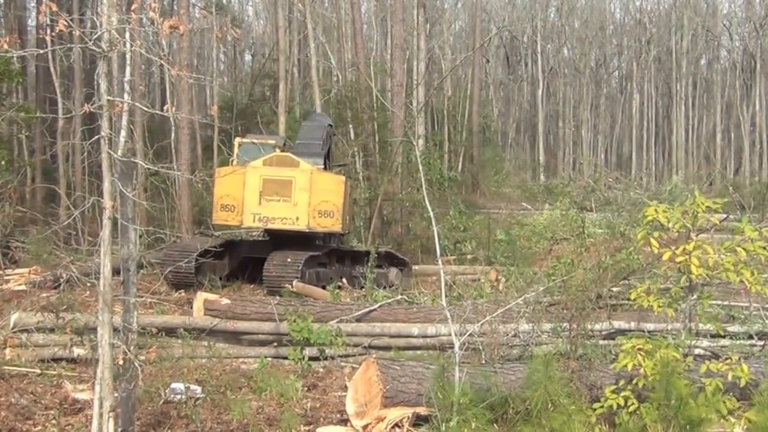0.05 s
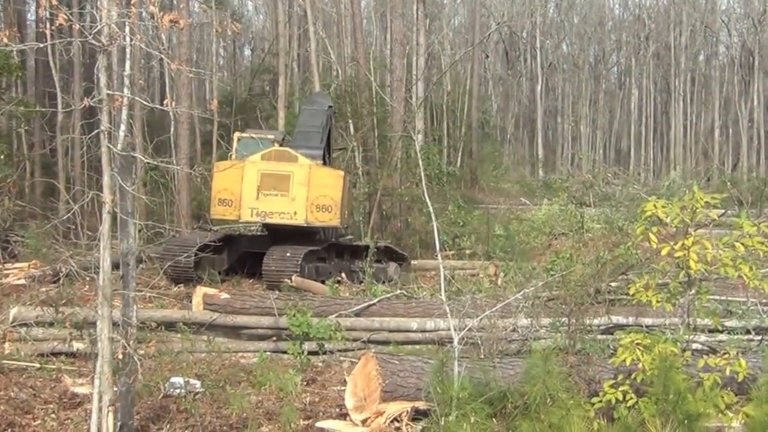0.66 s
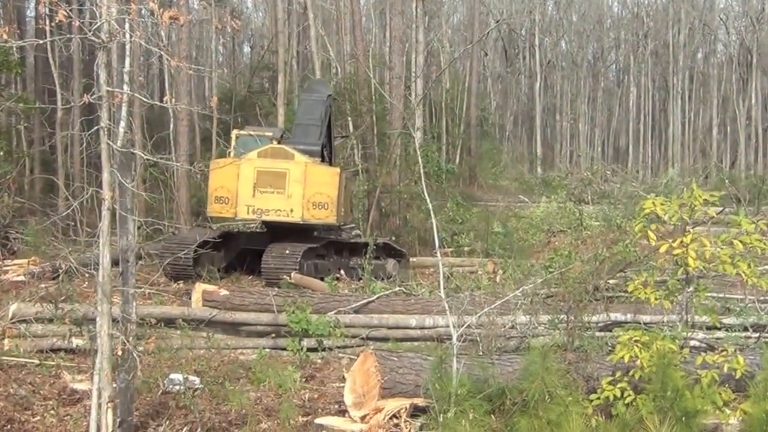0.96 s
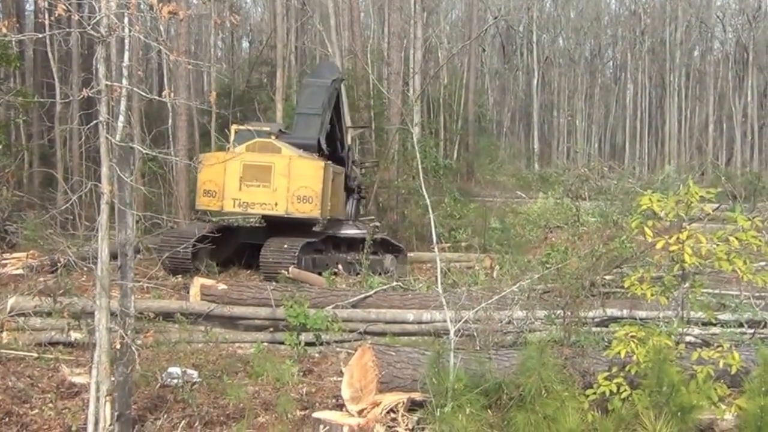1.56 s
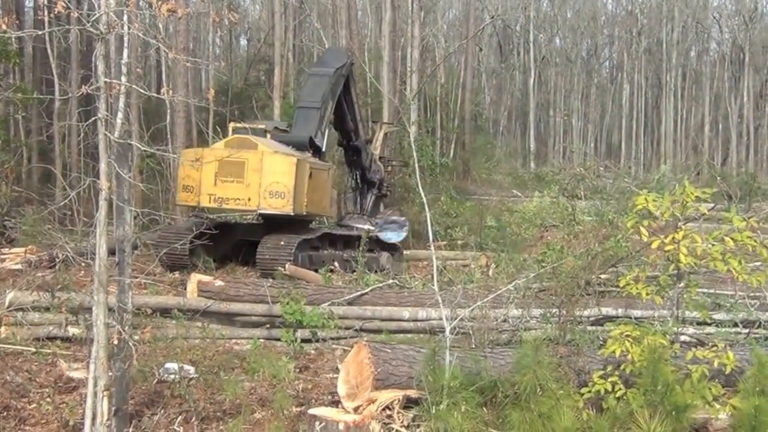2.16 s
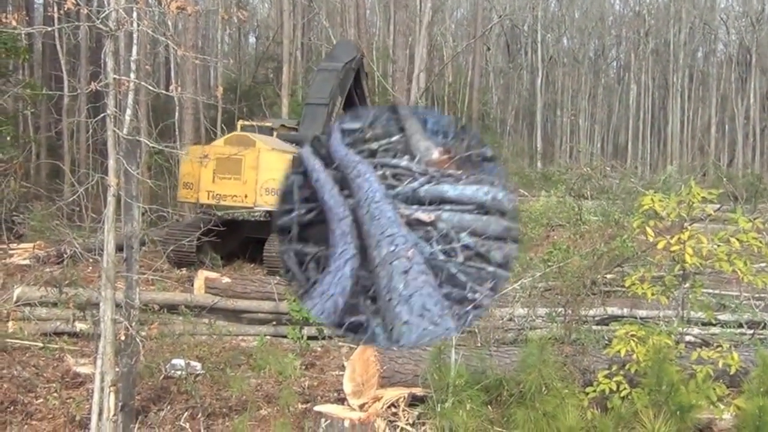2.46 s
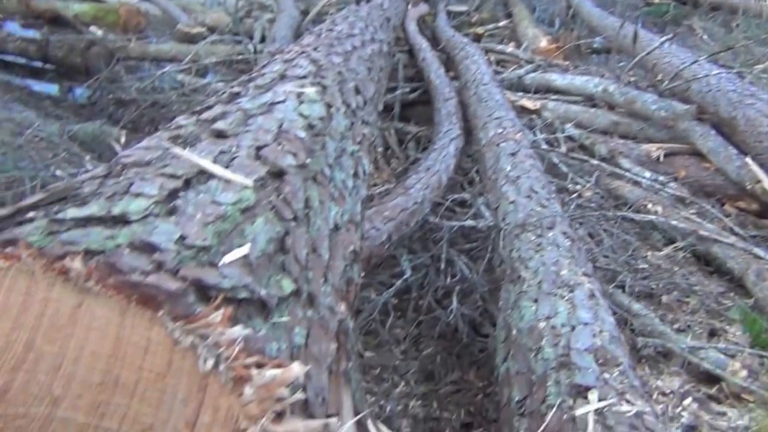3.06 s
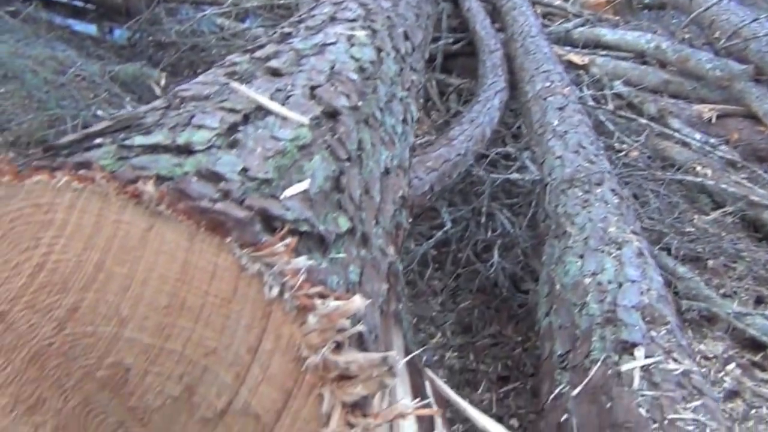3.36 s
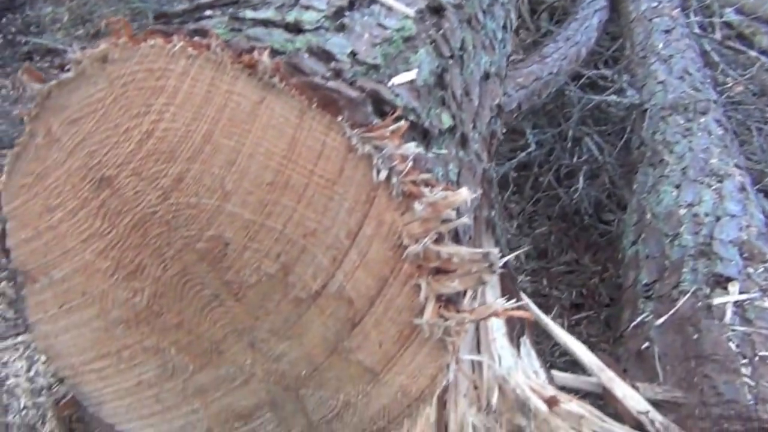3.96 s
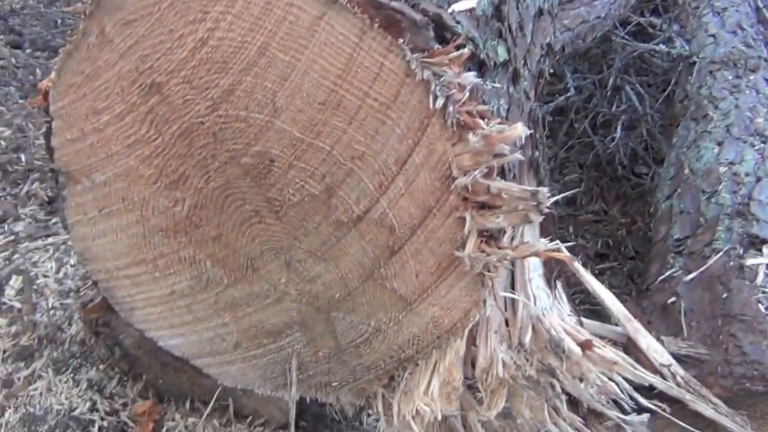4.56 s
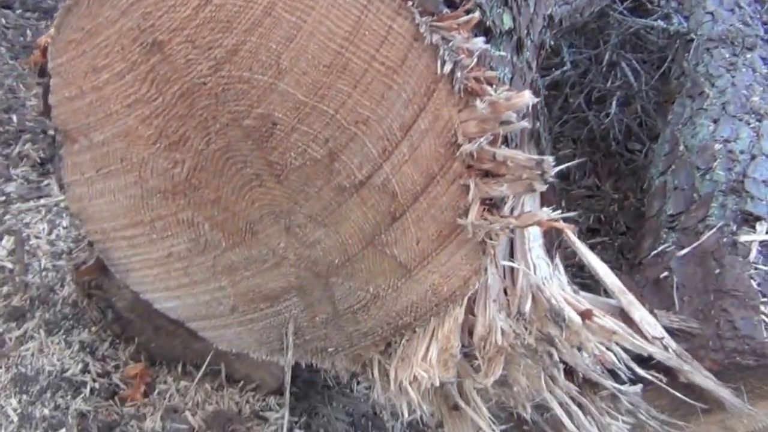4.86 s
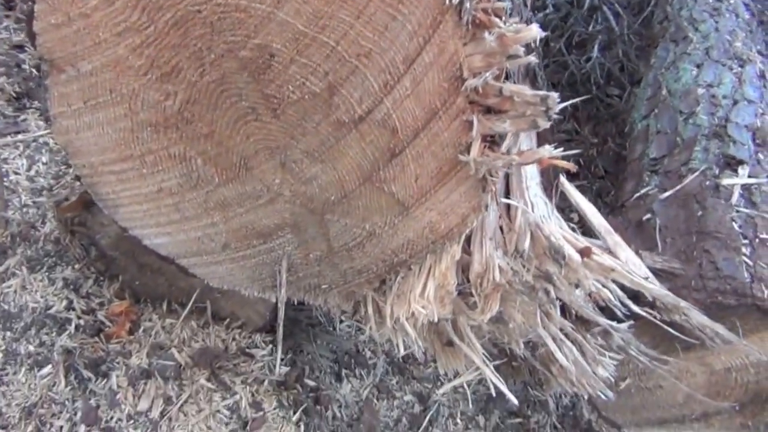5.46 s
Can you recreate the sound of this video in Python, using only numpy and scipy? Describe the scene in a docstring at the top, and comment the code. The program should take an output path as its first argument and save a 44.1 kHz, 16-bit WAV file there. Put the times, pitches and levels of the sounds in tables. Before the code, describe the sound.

A tracked tree feller runs at full throttle across a forest clearing, its diesel engine roaring under hissing hydraulics and a thin, high turbo whine. The engine sags under load and recovers, and a gear rasp grows as the body swings. The machine then fades into quiet woods with a low distant hum. A small bird whistles faintly over a soft rustle, and a twig snaps close to the microphone, followed by tiny cracks.

```python
"""A tracked tree feller runs at full throttle across a clearing: diesel firing harmonics, turbulent fan
roar, oil hissing through valves. Under load the engine sags and recovers while the turbo's blade tone
climbs. The body swings round with a rasp of pump gears, the load eases, and the machine fades into a
quiet wood. There a far engine drones, a thin whistle (perhaps a small bird) sounds over a faint high
rustle, a twig snaps fibre by fibre, and the soft, breathy rustle comes once more."""
import sys
import numpy as np
from scipy import signal
from scipy.fft import rfft, irfft
from scipy.io import wavfile

SR = 44100
rng = np.random.default_rng(int(sys.argv[2]) if len(sys.argv) > 2 else 0)


def pcm_store(signal):
    """Save signal as 16-bit PCM."""
    levels = np.round(np.clip(np.atleast_2d(signal), -1, 1) * 32767)
    wavfile.write(sys.argv[1], SR, levels.astype(np.int16).T)


N = 242991
T = np.arange(N) / SR
HZ = np.fft.rfftfreq(N, 1 / SR)


def amp(db):
    """Amplitude ratio of a level in decibels."""
    return 10 ** (np.asarray(db) / 20)


def unit(x):
    """Normalisation to rms 1."""
    return x / np.sqrt(np.mean(x ** 2) + 1e-20)


def response(points):
    """Magnitude response: levels interpolated over log frequency."""
    f, db = np.transpose(points)
    return amp(np.interp(np.log(HZ + 1), np.log(f + 1), db))


def ramp(start, length):
    """Linear rise from 0 to 1, then held."""
    return np.clip((T - start) / length, 0, 1)


def swell(start, length):
    """Semi-elliptical envelope, zero outside its span."""
    along = ramp(start, length)
    return 2 * np.sqrt(along * (1 - along))


def bump(centre, length):
    """Gaussian envelope."""
    return np.exp(-(2 * (T - centre) / length) ** 2)


def cycles_of(hz):
    """Phase in cycles: the time integral of frequency."""
    return np.cumsum(hz) / SR


def wander(rate_hz):
    """Random modulation: low-pass Gaussian noise of rms 1."""
    hz = HZ[HZ < 6000]
    real, imag = rng.standard_normal((len(hz), 2)).T
    return unit(irfft((real + 1j * imag) * np.exp(-(hz / rate_hz) ** 2), N))


def coloured_noise(spectrum):
    """Spectral shaping of white noise; rms 1."""
    return unit(irfft(rfft(rng.standard_normal(N)) * response(spectrum), N))


def narrowband(hz, width_hz):
    """A resonance driven by turbulence: a carrier of random amplitude and phase; rms 1."""
    angle = 2 * np.pi * cycles_of(np.full(N, hz))
    return unit(wander(width_hz) * np.cos(angle) + wander(width_hz) * np.sin(angle))


def surges(rows):
    """Superposition of noise-driven resonances, each coming and going."""
    return sum(amp(db) * bump(t, length) * narrowband(hz, width) for t, length, db, hz, width in rows)


def scatter(mid, side_spectrum, decay_s):
    """Scattering: echoes off trunks and ground arrive from the sides with random phase."""
    echoes = rfft(rng.standard_normal(N) * np.exp(-T / decay_s))
    side = irfft(rfft(mid) * np.exp(1j * np.angle(echoes)) * response(side_spectrum), N)
    return np.array([mid + side, mid - side])


# Ambient noise spectrum: f/Hz, relative level/dB
AMBIENT_SPECTRUM = [(20, -36), (55, -7.5), (115, -2.5), (145, -10), (215, -7), (280, -4), (420, -1.5),
                    (500, 1.5), (680, 0), (950, 0.5), (1600, -6), (3000, -22), (4000, -27.5), (15500, -30)]

def ambience():
    """Ambient noise of air and far machinery, with one engine's narrowband drone slowly growing."""
    wash = coloured_noise(AMBIENT_SPECTRUM) * amp(-43.5 + .5 * wander(4.9))
    drone = narrowband(81, width_hz=9) * amp(-68.5 + 8 * ramp(4.5, .74))
    return wash + drone


# Spectrum of the faint high rustle: f/Hz, relative level/dB
RUSTLE_SPECTRUM = [(2500, -25), (4500, -2), (6500, -5), (9000, -8), (15000, -22)]
# Soft hisses during and after the whistle: onset t/s, duration/s, level/dB
SOFT_HISSES = [(4.33, .75, -68), (5.28, .45, -66)]

def rustle(impulses_per_s=4000):
    """Shot noise: dense random impulses merge into two soft, breathy, crackling hisses."""
    impulses = rng.standard_normal(N) * (rng.random(N) < impulses_per_s / SR)
    crackle = unit(irfft(rfft(impulses) * response(RUSTLE_SPECTRUM), N))
    return crackle * sum(amp(db) * swell(t, length) for t, length, db in SOFT_HISSES)


# Whistled notes: onset t/s, duration/s, start f/Hz, end f/Hz, mid-glide arch/Hz, level/dB
WHISTLE_NOTES = [(4.18, .05, 4550, 4950, 30, -67.5), (4.222, .19, 4430, 4790, -110, -62.5),
                 (4.35, .07, 9450, 8920, -90, -65), (4.36, .06, 3450, 3020, 0, -70),
                 (4.405, .065, 4790, 4280, 40, -65), (4.495, .03, 8500, 5400, 700, -71),
                 (4.475, .065, 4660, 4930, -110, -66.5), (4.55, .08, 4500, 4270, 40, -65),
                 (4.635, .075, 4470, 4470, 130, -66.5), (4.745, .085, 4400, 4350, 55, -69)]

def whistle(jitter=.003):
    """Frequency modulation: each note is a near sine on an arched glide; a faint high ring lingers."""
    notes = np.zeros(N)
    for t, length, start_hz, end_hz, arch_hz, db in WHISTLE_NOTES:
        envelope = swell(t, length)
        hz = start_hz + (end_hz - start_hz) * ramp(t, length) + arch_hz * envelope ** 2
        cycles = cycles_of(hz * (1 + jitter * wander(120)))
        notes += envelope * amp(db) * unit(np.sin(2 * np.pi * cycles))
    return notes + amp(-71) * swell(4.35, .95) * narrowband(9500, width_hz=450)


# Fibre fractures: t/s, crack level/dB, ring level/dB, crack decay time/s
FRACTURES = [(3.583, -66, -76, 0.0044), (3.832, -72, -54, .004), (4.568, -38, -52, .0012),
             (4.572, -41, -47, 0.0055), (4.58, -55, -56, .004), (4.718, -66, -66, .004),
             (4.815, -63, -62, .004), (4.831, -60, -70, .005), (4.982, -63, -76, .005),
             (5.093, -59, -72, .003), (5.146, -61, -74, .003)]
# Spectrum of a crack: f/Hz, relative level/dB
CRACK_SPECTRUM = [(1500, -16), (2700, -5), (4800, -5), (6500, 2), (9000, -9), (15000, -14)]

def twig(ring_rise_s=.0037):
    """Brittle fracture: each fibre gives a decaying broadband crack, then a very high ring."""
    crack = coloured_noise(CRACK_SPECTRUM)
    ring = narrowband(13100, width_hz=800)
    out = np.zeros(N)
    for t, crack_db, ring_db, decay_s in FRACTURES:
        out += amp(crack_db) * crack * (T >= t) * np.exp(-abs(T - t) / decay_s)
        age = np.maximum(T - t, 0) / ring_rise_s
        out += amp(ring_db) * ring * age * np.exp(1 - age)
    return out


# Lateral sound in the wood: f/Hz, side minus mid level/dB
WOOD_SIDE = [(100, -32), (200, -20), (380, -21), (700, -13), (1300, -8), (4400, -5.5), (15000, -16)]

def quiet_wood():
    """Scattering among trees smears the distant sounds; the close twig stays sharp."""
    distant = scatter(ambience() + whistle() + rustle(), WOOD_SIDE, decay_s=.08)
    return distant + scatter(twig(), WOOD_SIDE, decay_s=.003)


GOVERNED_HZ = 94.5

def firing_rate(load_at_s=.36, sag_hz=16, recover_s=.96, settle_s=.7):
    """Damped governor response: load pulls the six cylinders' firing rate down, and it swings back."""
    since = np.maximum(T - load_at_s, 0)
    return GOVERNED_HZ - sag_hz * np.sin(np.pi * since / recover_s) * np.exp(-(since / settle_s) ** 2)


# Pump gear mesh tones: multiple of the firing rate, relative level/dB
MESH_TONES = [(17.7, 1.5), (20.85, 0.5), (24.4, -3)]

def gear_rasp():
    """Gear meshing: rough tones in bands of rattle grow as the body swings and drop as it brakes."""
    firing_hz = firing_rate()
    rasp = np.zeros(N)
    for order, db in MESH_TONES:
        core = narrowband(order * firing_hz, width_hz=18)
        rattle = narrowband(order * firing_hz, width_hz=140)
        rasp += amp(db) * (core + amp(-1) * rattle)
    driven = amp(-68) + amp(-33.5) * ramp(1.22, .72)
    braked = ramp(2.2, .3)
    return rasp * ((1 - braked) * driven + braked * amp(-42.5))


TURBO_REST_HZ, SPOOL_AT_S, SPOOL_S, RUN_DOWN_AT_S = 8650, .61, .92, 3.04

def turbo_pitch(coast_at_s=1.57, coast_s=1.0, run_down_hz_per_s=2100):
    """Blade-passing frequency follows rotor speed: it spools up, coasts, then runs down."""
    spool_hz = 1398 * np.sin(np.pi / 2 * ramp(SPOOL_AT_S, SPOOL_S))
    coast_hz = 680 * (1 - np.exp(-np.maximum(T - coast_at_s, 0) / coast_s))
    run_down_hz = run_down_hz_per_s * np.maximum(T - RUN_DOWN_AT_S, 0)
    return TURBO_REST_HZ + spool_hz - coast_hz - run_down_hz


# Envelope of the turbo's whistle: t/s, level/dB
TURBO_ENVELOPE = [(.2, -52), (.45, -39), (.62, -46.5), (.8, -45), (1.2, -39), (1.43, -50), (1.62, -38.5),
                  (2.08, -36.5), (2.35, -39.5), (2.62, -40), (2.85, -33.5), (2.97, -33), (3.13, -36),
                  (3.22, -45), (3.35, -58)]

def turbo():
    """Blade-passing tone: a fluttering core in a skirt of noise, breathier before the spool-up."""
    hz = turbo_pitch() * (1 + .0015 * wander(12))
    flutter = 1 + .55 * wander(28) + .3 * wander(7)
    cycles = cycles_of(hz * (1 + .003 * wander(90)))
    core_db = -4 * (1 - ramp(SPOOL_AT_S, SPOOL_S))
    core = amp(core_db) * unit(flutter * np.sin(2 * np.pi * cycles))
    skirt = amp(-2) * narrowband(hz, width_hz=130)
    return amp(np.interp(T, *np.transpose(TURBO_ENVELOPE))) * (core + skirt)


# Spectra of steady and of spilling oil flow: f/Hz, relative level/dB
HISS_SPECTRUM = [(3240, -16), (5500, -6.5), (7070, -4), (9960, -1), (11500, -5), (15500, -24)]
SPILL_SPECTRUM = [(3240, -14), (5000, -6), (7000, -4.5), (10000, -1), (11700, -5), (15500, -21)]
# Valves bleeding off: peak t/s, duration/s, level/dB, centre f/Hz, width/Hz
VALVE_SPURTS = [(.47, .16, -43, 10450, 250), (.49, .2, -40, 8100, 400), (.85, .08, -35, 11100, 1300),
                (.96, 0.15, -33.5, 10700, 1100), (1.5, .35, -49, 7550, 350),
                (1.82, 0.18, -29.5, 10100, 1900), (2.2, .55, -36.5, 10200, 1800),
                (2.38, .04, -30, 11000, 1400)]

def hydraulics(firings, flutter_db=.78):
    """Throttling noise: oil hisses and spurts through valves, rippled by the engine-driven pump."""
    hiss = coloured_noise(HISS_SPECTRUM) * amp(-32)
    spilling = ramp(1.84, 1.2) * (1 - ramp(RUN_DOWN_AT_S, .51))  # builds as the swing ends
    spill = coloured_noise(SPILL_SPECTRUM) * amp(-25.5) * spilling
    ripple = 1 + .05 * np.cos(2 * np.pi * firings)
    return (hiss + spill + surges(VALVE_SPURTS)) * ripple * amp(flutter_db * wander(17))


# Engine orders: multiple of the firing rate, relative level/dB, change as the load eases/dB
ENGINE_ORDERS = [(1, -1, -9), (2, -3, 1.5), (3.36, -6, 2.5), (4, -2, 3.5), (6, -5, 5), (6.5, -3.5, 2),
                 (7, -8, -2), (12.15, -13, 2)]
# Dips of the fundamental: centre t/s, duration/s, level change/dB
THROB_DIPS = [(0, 0.1, -12), (.272, 0.044, -20), (.5, 0.084, -12), (1.04, .11, -11), (1.37, .04, -6),
              (1.7, .14, -5), (1.87, .05, -7), (2.35, 0.054, -6)]
# Swells as the engine pulls: onset t/s, duration/s, order, level change/dB
PULL_SWELLS = [(.85, 0.27, 2, 7.5), (1.22, 0.19, 4, 8.5), (1.53, 0.11, 2, 6), (1.8, 0.25, 2, 3.5),
               (2.08, 0.27, 4, 7.5), (2.7, .18, 4, 2.5)]

def exhaust(firings, growl_db_per_khz=3.6):
    """Periodic firing radiates engine orders: a throbbing fundamental, and a growl rising with boost."""
    eased = ramp(2.2, .23)
    throb_db = -32.5 + sum(db * bump(t, length) for t, length, db in THROB_DIPS)
    growl_db = -38.5 + growl_db_per_khz * (turbo_pitch() - TURBO_REST_HZ) / 1000
    out = np.zeros(N)
    for order, db, eased_db in ENGINE_ORDERS:
        base_db, waver_depth, jitter_rad = (throb_db, .25, .25) if order == 1 else (growl_db, .45, .3)
        waver = 1 + waver_depth * wander(15)
        jitter = jitter_rad * wander(16)
        tone = unit(waver * np.sin(2 * np.pi * (order * firings + rng.random()) + jitter))
        swell_db = sum(rise * swell(t, length) for t, length, k, rise in PULL_SWELLS if k == order)
        out += amp(base_db + db + eased_db * eased + swell_db) * tone
    return out


# Spectra of fan and exhaust roar and of combustion clatter: f/Hz, relative level/dB
ROAR_SPECTRUM = [(20, -53), (35, -47), (55, -25), (85, -14), (150, -8), (240, -8), (320, -1), (430, -3.5),
                 (510, -1.5), (620, 1), (740, 0), (820, -1.5), (950, -1), (1130, 0.1), (1500, -5),
                 (2500, -20), (5000, -43.5)]
CLATTER_SPECTRUM = [(900, -26), (1600, -0.5), (2200, -1.5), (3000, -6), (4200, -10.5), (5800, -19),
                    (8000, -24.5), (12000, -44)]
# Hollow howls and rasps in the roar: peak t/s, duration/s, level/dB, centre f/Hz, width/Hz
ROAR_RESONANCES = [(.05, 0.4, -29.5, 730, 50), (.55, 0.69, -30, 848, 55), (1.22, .4, -31, 600, 25),
                   (2.05, .13, -27, 1150, 14), (2.075, .03, -28, 3000, 700), (2.29, 0.15, -25.5, 595, 29),
                   (2.9, .7, -32, 299, 39), (2.8, .4, -37, 2750, 120), (2.92, .5, -37, 4380, 150)]

def roar(firings, lag_s=.13, flutter_db=.48):
    """Turbulent flow noise of fan and exhaust, and combustion clatter: both weaken as the engine slows."""
    sag_hz = GOVERNED_HZ - np.interp(T - lag_s, T, firing_rate())
    turned_db = -.9 * ramp(1.76, .5)  # the body swings the fan away
    fuelling_db = 1.3 * swell(.22, .22)  # fuel is added for the load
    flow = coloured_noise(ROAR_SPECTRUM) * amp(-17 - .12 * sag_hz + turned_db)
    clatter = coloured_noise(CLATTER_SPECTRUM) * amp(-23.5 - .14 * sag_hz + fuelling_db)
    ripple = 1 + .06 * np.cos(2 * np.pi * firings)  # distance smears the firing pulses
    return (flow + clatter + surges(ROAR_RESONANCES)) * ripple * amp(flutter_db * wander(17))


# Lateral sound in the clearing: f/Hz, side minus mid level/dB
CLEARING_SIDE = [(30, -12), (85, -19), (200, -12.5), (700, -10.5), (1300, -11.5), (2400, -15.5),
                 (4400, -13), (8000, -11.5), (10000, -72)]
# Stereo balance of the machine: f/Hz, left minus right level/dB
BALANCE = [(60, -3), (200, -3.5), (380, -1.5), (700, -1), (1300, 0.4), (4400, 1.1), (8000, 0.65),
           (15000, -1)]

def feller():
    """Superposition of the machine's sources; a level difference places the bass to the right."""
    firings = cycles_of(firing_rate() * (1 + .002 * wander(8)))
    sound = exhaust(firings) + roar(firings) + hydraulics(firings) + gear_rasp() + turbo()
    pair = scatter(sound, CLEARING_SIDE, decay_s=.1)
    left_gain = np.sqrt(response(BALANCE))
    return irfft(rfft(pair) * np.array([left_gain, 1 / left_gain]), N)


def scene(fade_start_s=2.17, fade_end_s=3.493):
    """Linear cross-fade from the machine to the quiet wood."""
    faded = ramp(fade_start_s, fade_end_s - fade_start_s)
    return (1 - faded) * feller() + faded * quiet_wood()


def record(dry, cutoff_hz=15750):
    """Band limiting by a linear-phase low-pass filter."""
    low_pass = signal.firwin(511, cutoff_hz, window=("kaiser", 9), fs=SR)
    return signal.oaconvolve(dry, low_pass[None], "same")


dry = scene()
out = record(dry)
pcm_store(out)
```